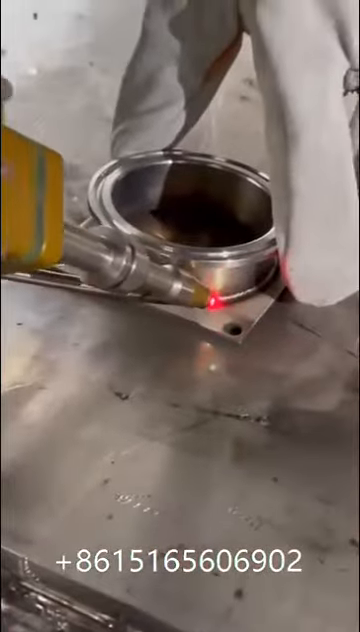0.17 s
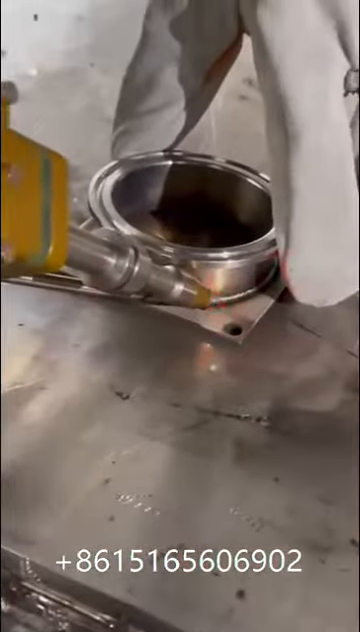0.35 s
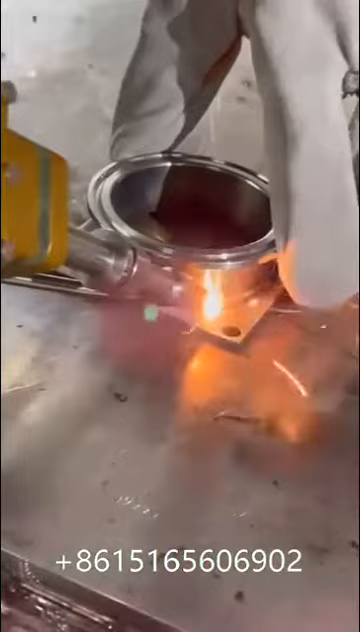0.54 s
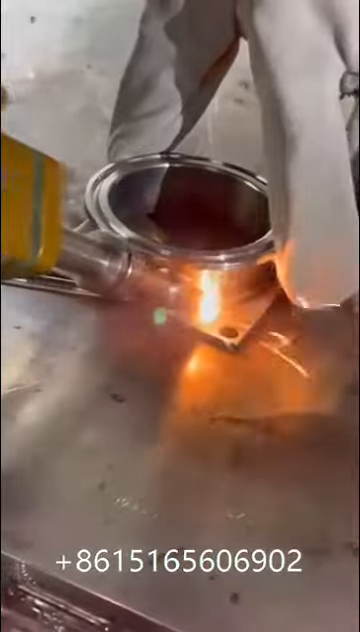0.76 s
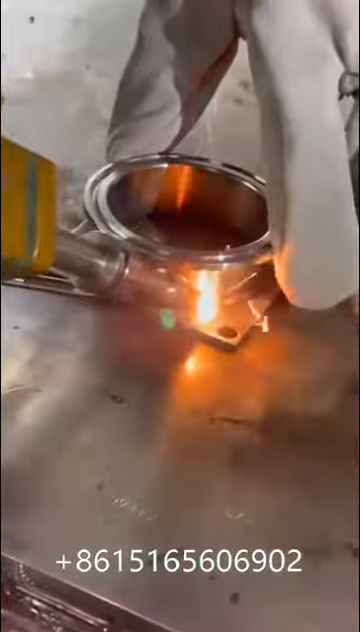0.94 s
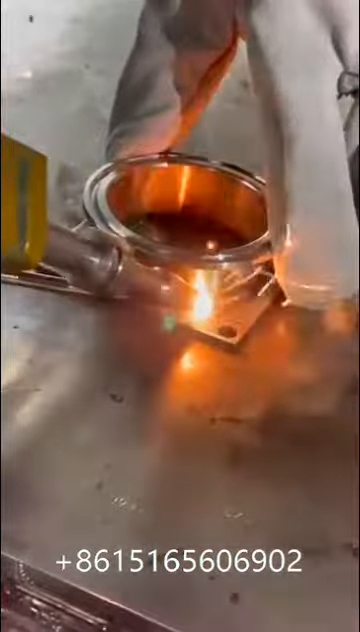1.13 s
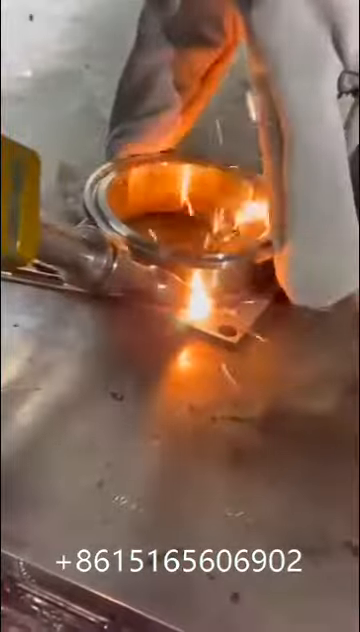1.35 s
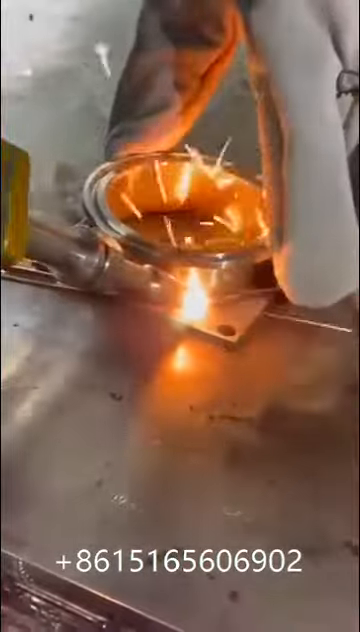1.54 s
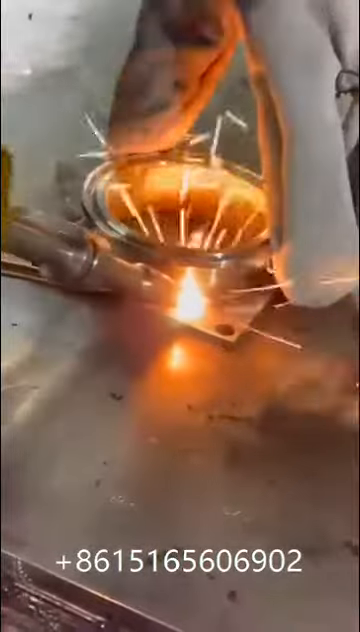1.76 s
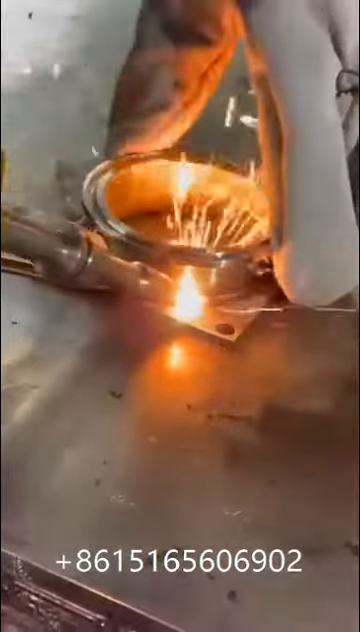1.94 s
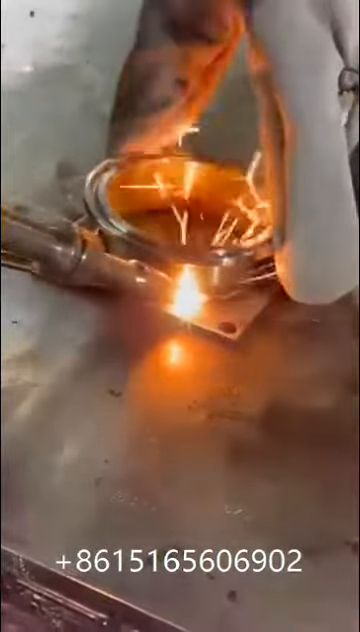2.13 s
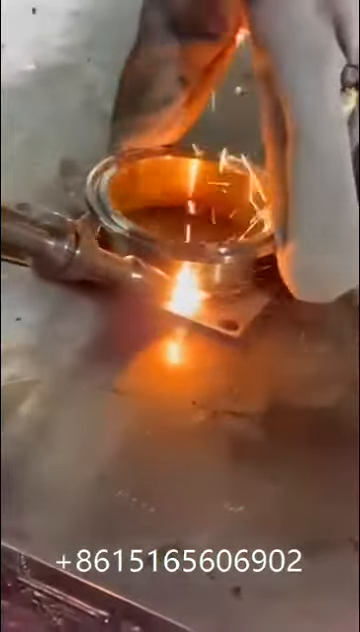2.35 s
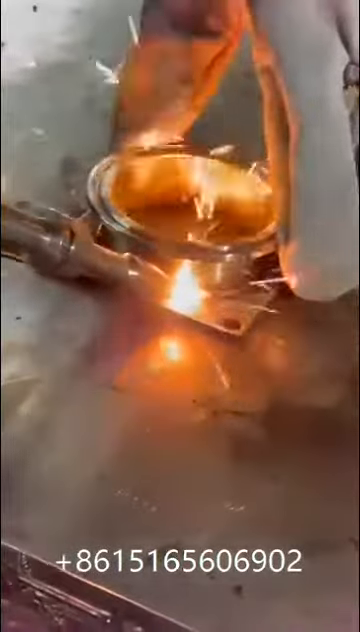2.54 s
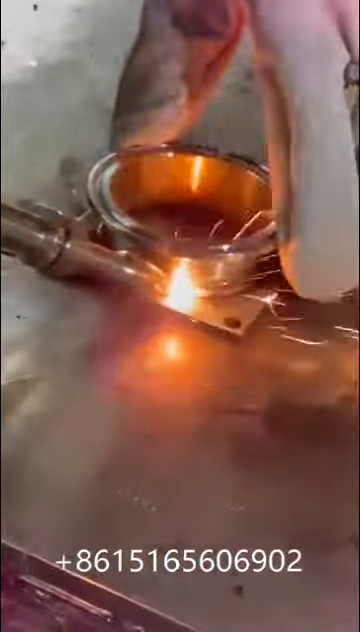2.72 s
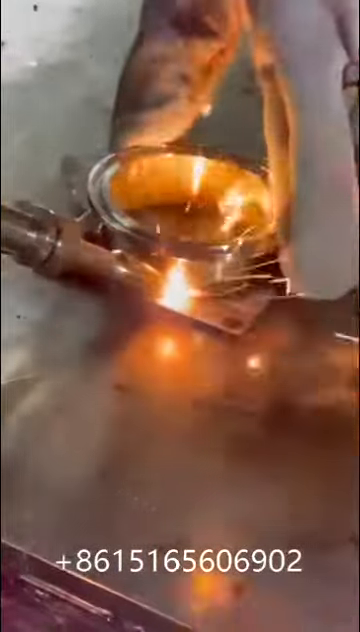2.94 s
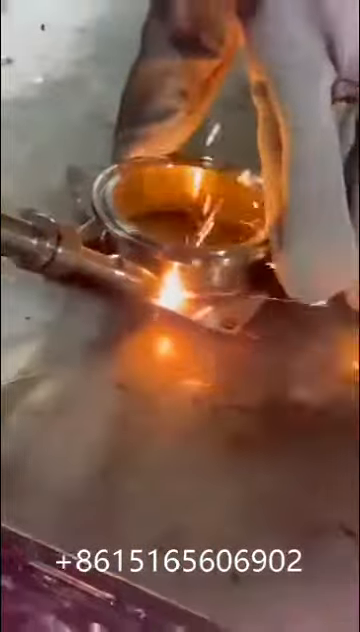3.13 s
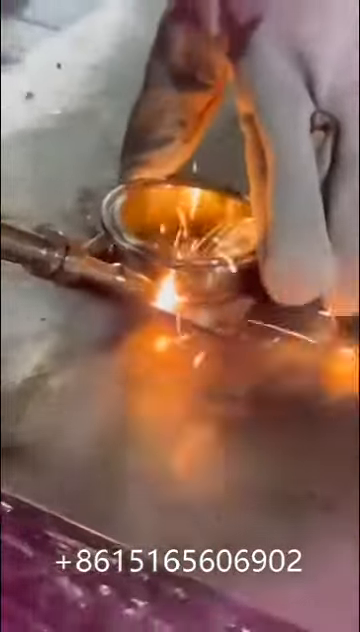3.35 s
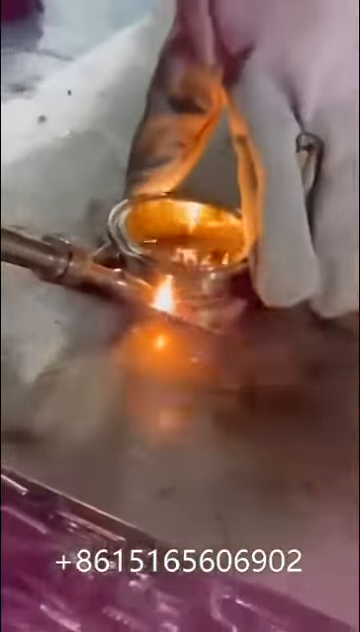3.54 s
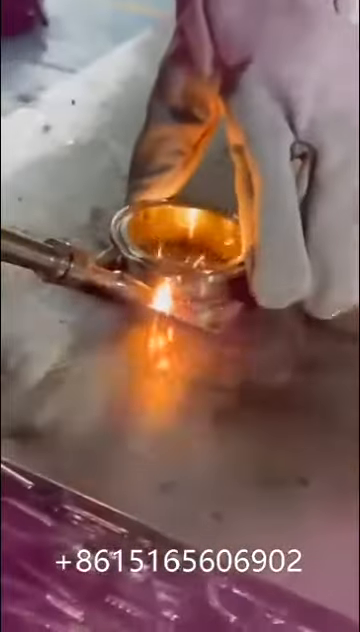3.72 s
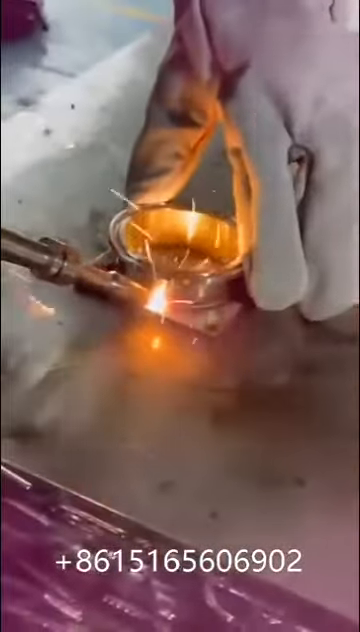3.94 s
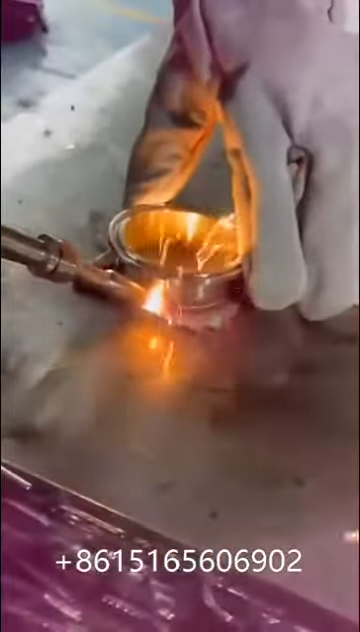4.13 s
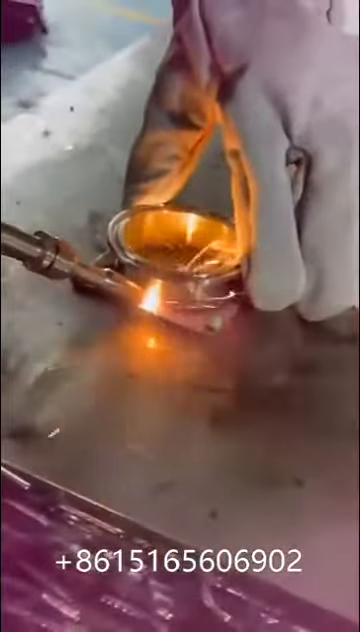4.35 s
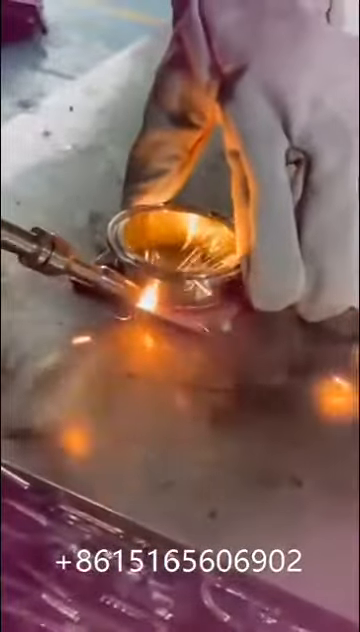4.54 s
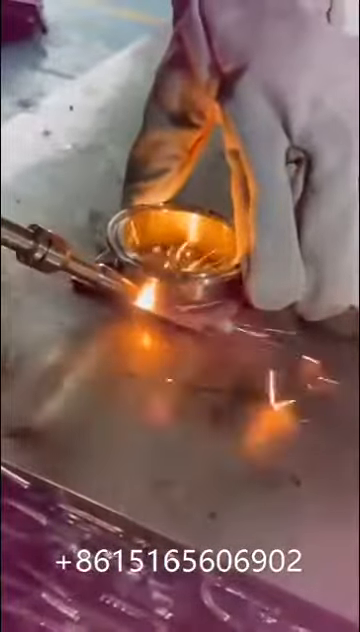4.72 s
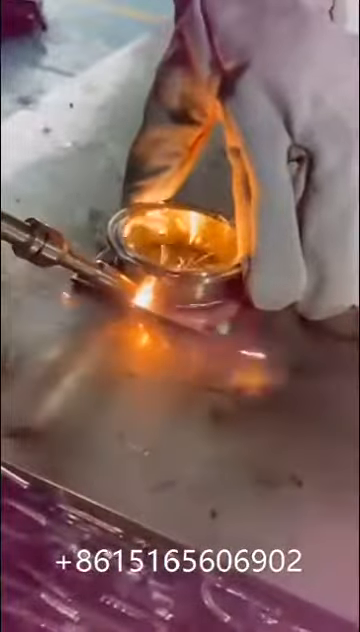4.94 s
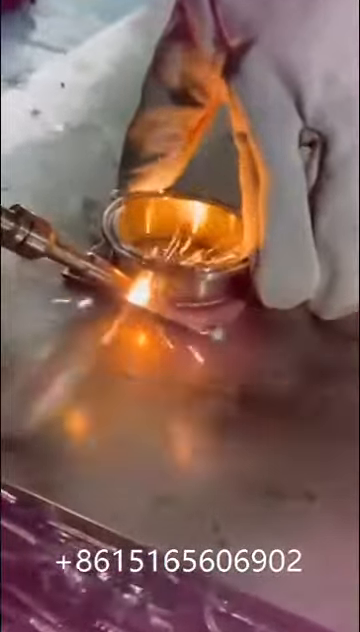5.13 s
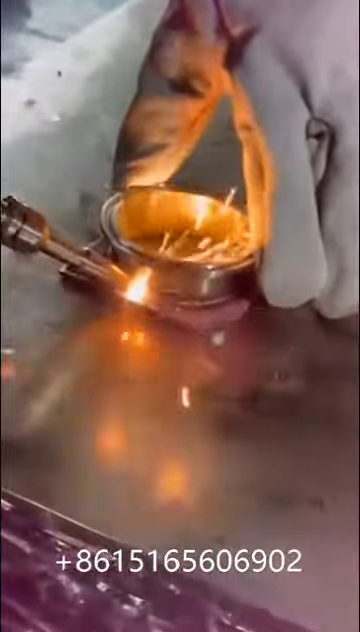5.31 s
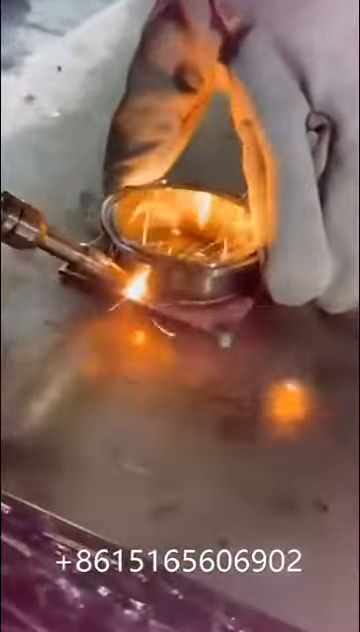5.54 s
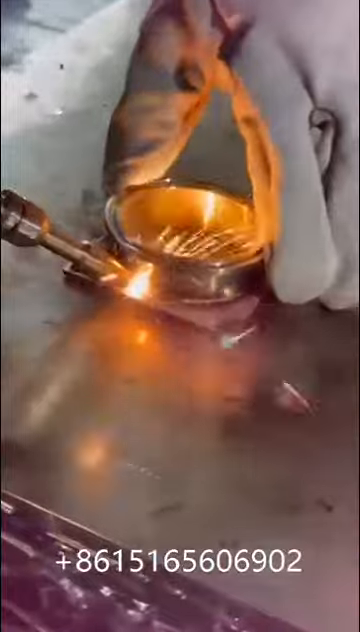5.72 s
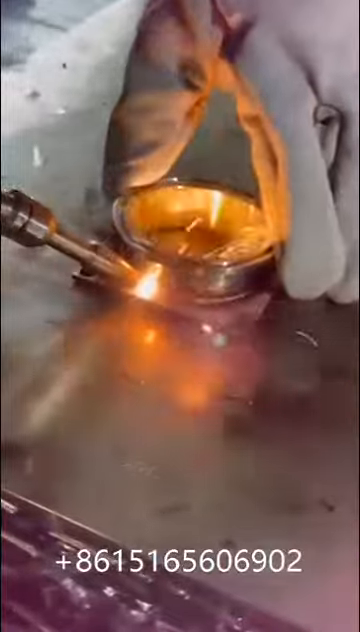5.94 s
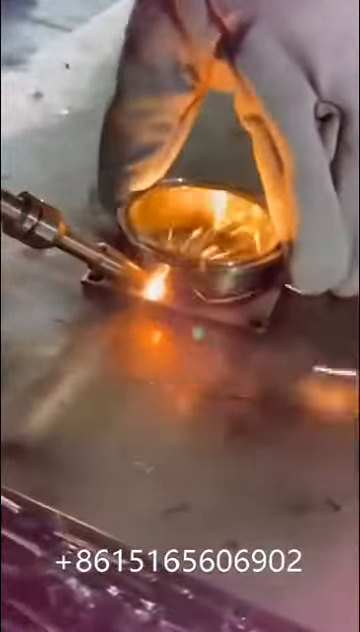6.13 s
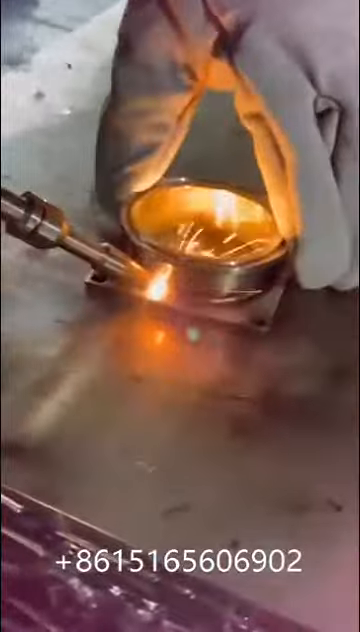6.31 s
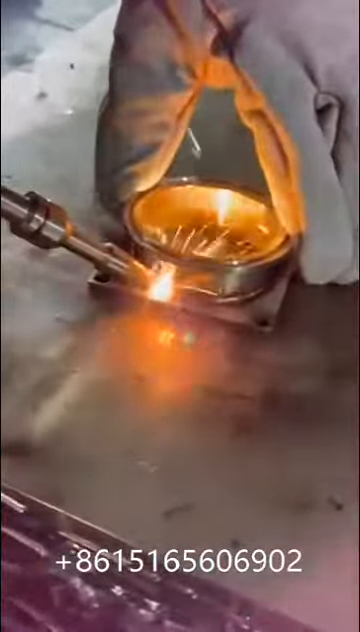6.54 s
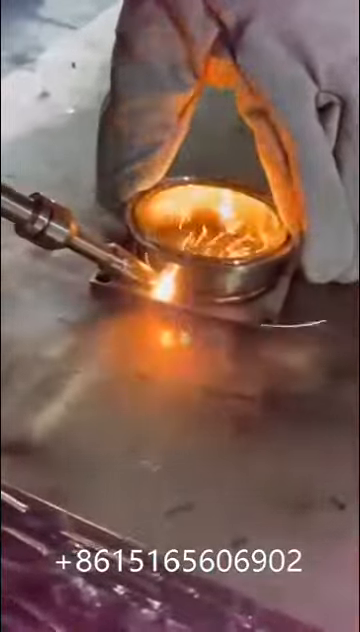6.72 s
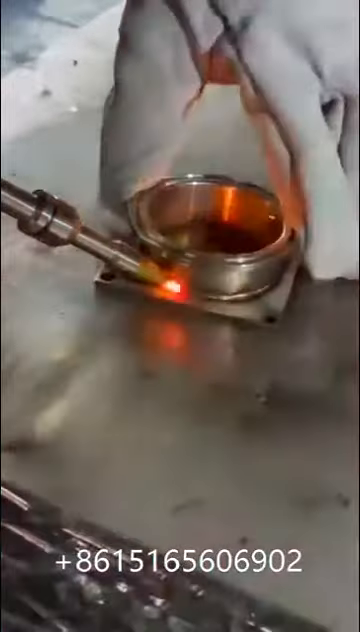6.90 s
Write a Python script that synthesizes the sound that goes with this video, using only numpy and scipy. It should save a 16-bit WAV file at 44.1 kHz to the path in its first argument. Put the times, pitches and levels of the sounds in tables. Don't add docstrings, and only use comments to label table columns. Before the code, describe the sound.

Close sizzling jet of hot metal vapour, steady and slightly buzzing, runs over fan and pump rumble until it abruptly stops with a thud.

```python
import sys
import numpy as np
from scipy import signal
from scipy.fft import rfft, irfft
from scipy.io import wavfile
from scipy.ndimage import map_coordinates

SR = 44100
rng = np.random.default_rng(int(sys.argv[2]) if len(sys.argv) > 2 else 0)


def master(y):
    cut = np.clip(np.atleast_2d(y).T, -1, 1)
    pcm = np.round(cut * 32767)
    wavfile.write(sys.argv[1], SR, pcm.astype(np.int16))


def makeup_ratio(level_db):
    decades = np.asarray(level_db, float) / 20
    return 10 ** decades


N = 311787
T = np.arange(N) / SR

WOBBLE_HZ = 96.14
STRIKE_S, RELEASE_S = 0.33, 6.739
CUT_IN_S, RUN_UP_S = 2.8, 0.2
DUCK_S, SETTLED_DB = 0.98, -2.5


def rms_one(x):
    return x / np.sqrt(np.mean(x ** 2) + 1e-20)


def bell(t, centre, width):
    return np.exp(-.5 * ((t - centre) / width) ** 2)


def in_time(rows, s):
    at, *columns = np.transpose(rows)
    return [np.interp(s, at, c) for c in columns]


def at_hz(points, hz):
    f_hz, level = np.array(points).T
    return np.interp(np.log(hz + 1), np.log(f_hz), level)


def drift(rate, s, count=1):
    knots = rng.standard_normal((count, 400))
    return np.array([rms_one(map_coordinates(k, [s * rate + 3], order=3)) for k in knots])


def held_drift(rate, hold=64):
    return drift(rate, T[::hold]).repeat(hold)[:N]


def patches(rate, width_hz, s, hz):
    knots = rng.standard_normal((120, 400))
    grid = np.meshgrid(hz / width_hz + 2, s * rate + 2, indexing="ij")
    return map_coordinates(knots, grid, order=1) * 2.3


def passing(rows, s, hz):
    return sum(size * bell(hz[:, None], f_hz, width_hz) * bell(s, when, length_s)
               for when, length_s, f_hz, width_hz, size in rows)


def shaped(x, response):
    return irfft(rfft(x) * response, N)


def wide_noise(spectrum, side_db):
    gain = makeup_ratio(at_hz(spectrum, np.fft.rfftfreq(N, 1 / SR)))
    mid, side = (rms_one(shaped(rng.standard_normal(N), gain)) for _ in range(2))
    return mid + makeup_ratio(side_db) * side * [[1], [-1]]


def in_bands(power, size):
    return power.reshape(*power.shape[:-1], -1, size).mean(axis=-1).repeat(size, axis=-1)


DROPOUTS = [
    1.385,
    5.81,
]


def duck_db():
    duck_depth_db, fall_s, recover_s = -5.5, 0.17, 0.84
    fall = np.clip((T - DUCK_S) / fall_s, 0, 1)
    back = np.exp(-np.clip(T - DUCK_S - fall_s, 0, 10) / recover_s)
    skips_db = -10 * sum(bell(T, s, .01) for s in DROPOUTS)
    return fall * (SETTLED_DB + (duck_depth_db - SETTLED_DB) * back) + skips_db


# [f/Hz, level/dB per Hz]
SHOP = [(30, -21), (60, -14), (110, -8), (200, -10), (350, -13.5), (500, -18.5), (900, -25), (1500, -28),
        (3000, -31), (4000, -35.5), (5300, -34), (7500, -37.5), (9500, -40), (11100, -41.5), (11800, -48),
        (13000, -46), (14200, -45), (16000, -51)]
# [f/Hz, likeness -1 to 1]
SHOP_ALIKE = [(40, .4), (250, .85), (500, .8), (1000, .3), (2200, .65), (3300, .9), (5300, .93), (6200, 0),
              (8500, .1), (11000, .5), (13000, .2), (14000, -.6), (15500, -.5)]
# [f/Hz, level/dB]
FANS = [(70.66, -50), (71.07, -54), (141.31, -49), (142.15, -49), (283.5, -61)]
# [f/Hz, width/Hz, level/dB]
PUMP = [
    (51.4, 3.3, -9.5),
    (68.7, 6.6, -11.5),
    (96, 24, -7.5),
]


def shop():
    hz = np.fft.rfftfreq(N, 1 / SR)
    colour = makeup_ratio(at_hz(SHOP, hz))
    alike = np.clip(at_hz(SHOP_ALIKE, hz), -1, 1)
    mid = shaped(rng.standard_normal(N), colour * np.sqrt(1 + alike))
    side = shaped(rng.standard_normal(N), colour * np.sqrt(1 - alike))
    middle = shaped(mid, (hz > 160) & (hz < 700)).std()
    duck = duck_db()
    noise = (mid + side * [[1], [-1]]) / middle * makeup_ratio(duck - 42.5)
    ride_db = duck - duck.mean()

    in_step_s = .44
    fans = sum(makeup_ratio(db) * np.sqrt(2) * np.cos(2 * np.pi * f_hz * (T - in_step_s)) for f_hz, db in FANS)

    pump = 0
    for f_hz, width_hz, db in PUMP:
        resonance = 1 / (1 + ((hz - f_hz) / width_hz) ** 2)
        pump = pump + makeup_ratio(db) * rms_one(shaped(rng.standard_normal(N), resonance))
    unloaded_db = -3 * (T < 0.21)
    surge_db = 1.5 * held_drift(8.0)
    return noise + fans * makeup_ratio(ride_db) + pump * makeup_ratio(-44.5 + unloaded_db + ride_db + surge_db)


# [multiple of the cycle rate, level/dB]
COMPRESSOR = [(25, -50), (26, -57), (28, -54), (29, -59), (30, -58), (31, -56), (35, -58), (36, -57),
              (37, -63), (38, -60), (39, -62), (42, -60), (43, -63), (47, -60), (48, -58)]


def compressor():
    cycle_hz = 2.566
    tones = sum(makeup_ratio(db) * np.sin(2 * np.pi * (k * cycle_hz * T + turn))
                for (k, db), turn in zip(COMPRESSOR, rng.random(len(COMPRESSOR))))
    return np.sqrt(2) * tones * np.clip((T - CUT_IN_S) / RUN_UP_S, 0, 1)


# [f/Hz, level/dB per Hz]
RUSH = [(300, -14), (600, 1), (1400, -2.5), (2500, -14.5), (4000, -27)]


def compressor_rush():
    since = np.clip(T - CUT_IN_S, 0, 10)
    return wide_noise(RUSH, side_db=-12) * np.clip(since / RUN_UP_S, 0, 1) * makeup_ratio(-60 - 1.3 * since)


# [t/s, length/s, level/dB]
PUFFS = [(0.128, 0.079, -45), (0.38, 0.039, -42), (0.635, 0.017, -60), (0.85, 0.032, -42.5),
         (1.114, 0.057, -49), (1.366, 0.037, -38.5), (1.796, 0.12, -43.5), (1.988, 0.04, -47.5),
         (2.3, 0.034, -50), (2.54, 0.05, -47.5), (2.84, 0.016, -50), (3.598, 0.02, -49),
         (3.716, 0.029, -47), (4.33, 0.041, -53), (4.79, 0.011, -49), (4.98, 0.064, -47.5),
         (5.22, 0.025, -49), (5.522, 0.02, -39.5), (5.807, 0.058, -43), (6.185, 0.083, -41),
         (6.559, 0.032, -38), (6.833, 0.058, -43.5), (7.04, 0.022, -39)]


def puffs():
    band = signal.butter(2, [60, 300], "band", fs=SR, output="sos")
    low = rms_one(signal.sosfilt(band, rng.standard_normal(N)))
    gusts = sum(makeup_ratio(db) * bell(T, s, length_s) for s, length_s, db in PUFFS)
    return low * gusts * [[1], [-1]]


# [f/Hz, level/dB per Hz]
GAS = [(500, -13), (1000, 5.5), (2200, 11.5), (3500, -11.5), (6000, -2), (9000, -41.5)]
# t/s, length/s, level/dB
GAS_SURGE = (6.3, .09, 8)


def shield_gas():
    valve_db = -200 * np.clip(.43 - T, 0, 1) - 700 * np.clip(T - RELEASE_S, 0, 1)
    ducked_db = .65 * (duck_db() - SETTLED_DB) * (T > DUCK_S)
    surge_s, length_s, surge_db = GAS_SURGE
    flow_db = surge_db * bell(T, surge_s, length_s) + 2.0 * held_drift(10)
    return wide_noise(GAS, side_db=-7.96) * makeup_ratio(-53 + ducked_db + flow_db + valve_db)


# [f/Hz, level/dB per Hz]
AFTERFLOW = [(3000, -21), (5600, 2), (6400, -4), (7800, 3), (8500, -9), (9500, -4), (13200, -7),
             (14300, -30)]


def afterflow():
    since = T - RELEASE_S
    return wide_noise(AFTERFLOW, side_db=-0.8) * (since > 0) * makeup_ratio(-59 - 5 * since)


def valve():
    start_hz, sag_hz_per_s = 112, 500
    since = np.clip(T - 6.7595, 0, .1)
    swing = np.sin(2 * np.pi * since * (start_hz - sag_hz_per_s * since / 2))
    envelope = (1 - np.exp(-since / .006)) * np.exp(-since / .022) * (since < .1)
    return -makeup_ratio(-26) * swing * envelope


def trigger_db():
    grown = np.clip((T - STRIKE_S) / .16, 1e-4, 1)
    return 1.05 * 20 * np.log10(grown) - 1350 * np.clip(T - RELEASE_S, 0, 1)


# [t/s, depth 0-1, lopsided sweep 0-1]
SEAM = [
    (.4, .4, 0),
    (.9, .5, 0),
    (1.4, 1.0, 0),
    (2.5, 1.0, 0),
    (3.6, 1.0, .36),
    (5.4, 1.0, .49),
    (6.1, 1.0, .4),
    (6.5, .4, .35),
]
# [multiple of the wobble, level/dB]
BUZZ = [(1, -8), (2, -3), (3, -3), (4, 0), (5, -3), (6, -4), (7, -5), (8, -3.5), (9, -8), (10, -12),
        (12, -7), (13, -11), (14, -13), (16, -11)]


def buzz():
    coarse, out = T[::64], 0
    odd_db = -8 * np.clip(1 - in_time(SEAM, coarse)[1] / .2, 0, 1)
    sways = drift(7.0, coarse, count=len(BUZZ))
    for (k, order_db), sway, turn in zip(BUZZ, sways, rng.random(len(BUZZ))):
        spread_db = 1.2 if k == 8 else 2.8
        gain = makeup_ratio(order_db + np.interp(T, coarse, spread_db * sway - 1 + k % 2 * odd_db))
        out = out + gain * np.sin(2 * np.pi * (k * WOBBLE_HZ * T + turn))
    depth, lopsided = in_time(SEAM, T)
    push_db = -54.5 - 9.5 * (1 - depth) + 6 * lopsided + trigger_db()
    return out * makeup_ratio(push_db) * makeup_ratio([[.5], [-.5]])


# [place in the sweep 0-1, level/dB]
FLARES = [
    (.42, 3.2),
    (.89, 3.6),
]


def vapour_jet():
    depth, lopsided = in_time(SEAM, T)
    sweep = 2 * np.pi * WOBBLE_HZ * T
    flare_db = 0
    for (place, db), lean in zip(FLARES, [-.6, .6]):
        pulse = np.exp(3 * (np.cos(sweep - 2 * np.pi * place) - 1))
        flare_db = flare_db + db * (1 + lean * lopsided) * pulse
    sputter_db = .25 * held_drift(16, hold=8) + .9 * held_drift(45, hold=8)
    jet = rng.standard_normal((3, N)) * makeup_ratio(flare_db * depth + sputter_db)
    spit_gain = makeup_ratio(3.0 * np.minimum(rng.exponential(1, N), 2) + 11)
    spits = (rng.random(N) < 60 / SR) * spit_gain
    jet[0] += spits * rng.choice([-1, 1], N)
    return jet


# [t/s, level/dB, aim towards the ports 0-1]
PLUME = [(0.5, -33.5, 0.1), (0.93, -34, 0.5), (1.06, -37.5, 0.1), (1.6, -36, 0), (1.78, -36, 0.1),
         (2.02, -33.5, 0.14), (2.3, -35.5, 0.4), (2.62, -36, 0.5), (2.78, -38.5, 0.8), (3.7, -38.5, 0.4),
         (4.2, -37, 0.8), (4.6, -38.5, 1), (5.0, -38.5, 0.98), (5.4, -38.5, 0.88), (6.0, -36.5, 0.8),
         (6.2, -36, 0.77), (6.58, -33, 0.04), (6.74, -32, .0)]
SHARE_HZ = [
    3500,
    7000,
    11000,
    14500,
]
# t/s, length/s, level/dB
CRATER = (6.722, .02, 2.0)
# [f/Hz, level/dB per Hz]
HISS = [(500, -18.5), (1000, -20), (1800, -18), (3000, -9), (4200, -8), (5000, -3), (6200, -2), (7800, -2),
        (9350, 2), (10300, -2), (12300, 1.5), (13200, 2.5), (14300, 1.5), (15450, 6), (15750, -4)]
# [f/Hz, width/Hz, early level/dB, midway level/dB, late level/dB]
DIPS = [(1750, 150, -2, -3, -2), (3300, 180, -4, -3, -3), (4430, 60, -13, -10, -5), (5560, 110, -3, -7, 0),
        (7120, 110, -6, -8, -6), (8680, 190, -9, -7, -6), (9800, 100, -8, -7, -6), (10680, 130, -6, -3, -3),
        (11830, 110, -5, -10, -10), (12750, 170, -9, -11, -14), (13620, 150, -16, -11, -8),
        (14800, 150, -2, -3, -7), (15250, 80, -4, -4, -2)]
TURN_S = [
    1.8,
    3.6,
    5.4,
]
# [t/s, length/s, f/Hz, width/Hz, level/dB]
BAND_SWELLS = [(0.75, .22, 13050, 190, -15), (1.35, 0.28, 17000, 120, -7), (4.1, 0.3, 17000, 200, -14),
               (3.5, 0.31, 8500, 190, -11.5), (5.7, .4, 13120, 310, -11), (6.12, 0.27, 11000, 130, -17),
               (5.34, .6, 12600, 140, 12.5), (3.1, 0.47, 12450, 140, -5), (2.9, 1, 11100, 170, -3),
               (6.8, 0.25, 11250, 250, -4.5), (6.6, 0.18, 10350, 200, -8.5), (5.6, 0.34, 10050, 310, 6.5),
               (.75, 0.45, 8300, 240, 4.5), (.8, .45, 7480, 150, -6), (5.7, 0.42, 6500, 320, 1.5),
               (5.3, 0.95, 6850, 190, 7), (2.3, 0.46, 7900, 480, -4), (6.1, 0.48, 7750, 290, -6),
               (1.4, .3, 14350, 190, 4), (.6, .35, 15080, 190, 4.5), (4.4, .35, 15050, 130, 7),
               (2.6, 0.64, 15450, 160, -3), (6.71, 0.048, 6100, 310, -8), (5.1, 0.11, 8800, 250, 0.5),
               (3.1, .4, 5050, 120, 2.5), (3.1, 0.31, 5900, 490, -2), (4.2, .5, 11650, 150, 2.5),
               (6.6, .15, 20000, 150, 3), (0.62, 0.43, 10800, 140, 7.5), (2.6, 0.88, 10880, 100, -5.5),
               (5.6, 0.73, 10900, 190, 6.5), (1.4, 0.33, 12100, 270, 4.5), (6.71, 0.045, 13300, 1200, -2),
               (3.7, 0.61, 8520, 130, 5), (4.9, .3, 6900, 150, 7), (4.9, .3, 15050, 200, -4),
               (6.2, .25, 14000, 250, -3), (1.4, 0.46, 4400, 300, 3), (0.45, .05, 6900, 900, -3),
               (.52, .07, 5050, 460, 1), (4.27, 0.18, 8300, 500, 2), (1.8, 0.13, 8100, 500, 3),
               (2.95, .2, 12600, 900, 1.5)]
# [t/s, f/Hz, level/dB]
CUP = [(.38, 5050, 0), (.5, 5050, 3), (1.0, 5050, 1.5), (4.4, 5050, 2), (5.0, 5450, 3.5), (6.35, 5450, 4),
       (6.45, 5400, 1), (6.6, 5300, 1), (6.67, 5220, 4), (6.72, 5220, 9)]


def plume_colour_db(s, hz, treble):
    f_hz = hz[:, None]
    aim = in_time(PLUME, s)[1]
    crater_s, crater_length_s, crater_db = CRATER
    low_db = crater_db * bell(s, crater_s, crater_length_s)
    rock_db = 2.5 * np.cos(2 * np.pi * (s - .7) / 3) - .7 * s
    shares = np.array([low_db, -4.5 * aim, rock_db, 5 * aim])
    weight = np.array([np.interp(hz, SHARE_HZ, row) for row in np.eye(4)])
    colour_db = at_hz(HISS, hz)[:, None] + weight.T @ (shares - shares.mean(axis=1, keepdims=True))

    warm_s = .75
    for (dip_hz, width_hz, *depths_db), sway in zip(DIPS, drift(1.1, s, count=len(DIPS))):
        centre_hz = dip_hz * (1 + .006 * sway)
        formed = 1 - (dip_hz < 5000) * bell(s, STRIKE_S, warm_s * .7)
        colour_db += formed * np.interp(s, TURN_S, depths_db) * bell(f_hz, centre_hz, width_hz)
    colour_db += passing(BAND_SWELLS, s, hz)
    cup_hz, cup_db = in_time(CUP, s)
    colour_db += cup_db * bell(f_hz, cup_hz, 180)

    colour_db += treble * (.3 * patches(1.2, 300, s, hz) + .9 * patches(26, 500, s, hz))
    colour_db += 1.5 * np.clip(1 - treble, 0, 1) * patches(30.0, 164.2, s, np.minimum(hz, 9000))
    return colour_db + 3.5 * bell(f_hz, 4200, 900) * bell(s, STRIKE_S, warm_s)


# [f/Hz, lead of the left port/rad]
PORTS = [(100, .1), (2100, .1), (2600, .95), (3400, .3), (4250, .55), (5200, .05), (6150, 1.4), (7100, 2.9),
         (8250, 3.3), (8700, 5.0), (9350, 5.7), (9900, 4.3), (10600, 5.9), (11500, 6.8), (12250, 8.9),
         (12650, 7.3), (13450, 8.4), (13900, 6.9), (14500, 7.2), (15000, 6.8), (15600, 6.4)]
# [t/s, length/s, f/Hz, width/Hz, turn/rad]
SWINGS = [(.9, .7, 14200, 230, 2.2), (.75, .3, 14900, 200, -.5), (5.6, .4, 12050, 150, 1),
          (6.62, .15, 9300, 450, .6), (6.7, .05, 8600, 200, 1.2), (4.9, .3, 9300, 250, -.7),
          (5.8, .5, 10150, 200, -1), (.75, .3, 11300, 250, .6), (2.2, .35, 11300, 400, -.35),
          (6.4, .35, 11400, 300, -.4), (2.3, .4, 13200, 250, -1), (6.4, .3, 13300, 250, -1),
          (2.25, .3, 14100, 300, -.7), (5.7, .5, 14950, 250, -.5), (.75, .3, 12800, 150, -.7),
          (2.2, .5, 10350, 200, .6), (6.65, .12, 10050, 250, 1.6), (.75, .3, 12150, 250, -1),
          (.7, .3, 10200, 350, -.7), (5, 1.2, 8400, 200, .6), (6.71, .04, 15500, 350, 1.5),
          (3.1, .4, 12800, 200, -.7), (4.1, .4, 11750, 250, -.7), (5.6, .35, 15400, 300, -.2)]
# caught t/s, fade/s, level/dB
STUMBLE = (6.663, .016, -10.5)


def plume():
    hz, s, frames = signal.stft(vapour_jet(), SR, nperseg=512, noverlap=384)
    caught_s, fade_s, slip_db = STUMBLE
    treble = np.clip(hz / 9000, 0, 1.3)[:, None] ** 2
    colour_db = plume_colour_db(s, hz, treble)

    lead = at_hz(PORTS, hz)[:, None] + passing(SWINGS, s, hz)
    lead += treble * (hz[:, None] > 8200) * .3 * patches(22, 700, s, hz)
    direct = frames[0] * np.exp(.5j * np.array([lead, -lead]))
    unformed = np.clip((.47 - s) / .04, 0, 1) + bell(s, caught_s, fade_s)
    scatter = makeup_ratio(11 * unformed - 12)
    both = (direct + scatter * frames[1:]) / np.sqrt(1 + scatter ** 2)
    out = signal.istft(both * makeup_ratio(colour_db), SR, nperseg=512, noverlap=384)[1][:, :N]

    band = signal.butter(4, [2000, 5600], "band", fs=SR, output="sos")
    low = signal.sosfilt(band, out.mean(axis=0))
    gate_db = slip_db * bell(T, caught_s - fade_s / 2, fade_s) * (T < caught_s)
    return out / low.std() * makeup_ratio(in_time(PLUME, T)[0] + gate_db + trigger_db())


def scene():
    workshop = shop() + compressor() + compressor_rush()
    gas = puffs() + shield_gas() + afterflow() + valve()
    return workshop + gas + buzz() + plume()


def low_pass(x):
    return signal.sosfilt(signal.butter(12, 16470, fs=SR, output="sos"), x)


def record(dry):
    return low_pass(dry)


dry = scene()
out = record(dry)
master(out)
```